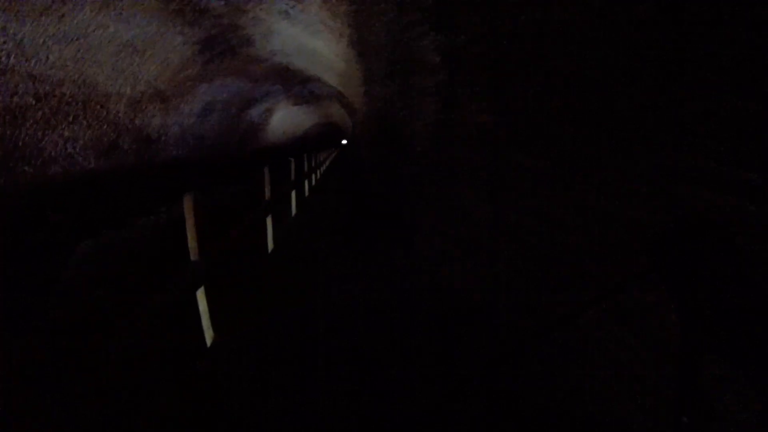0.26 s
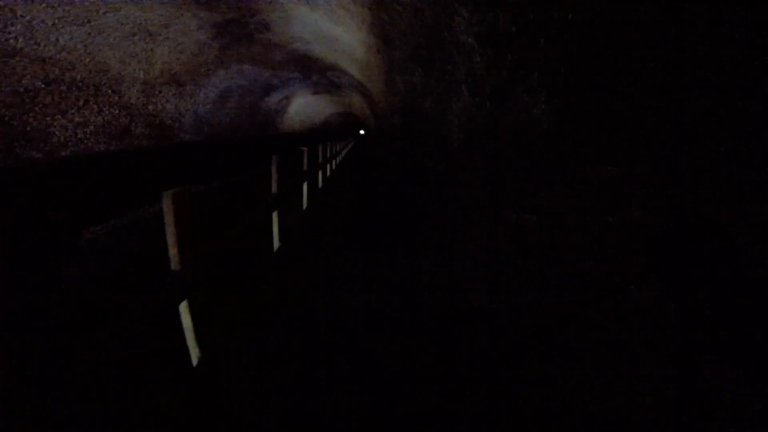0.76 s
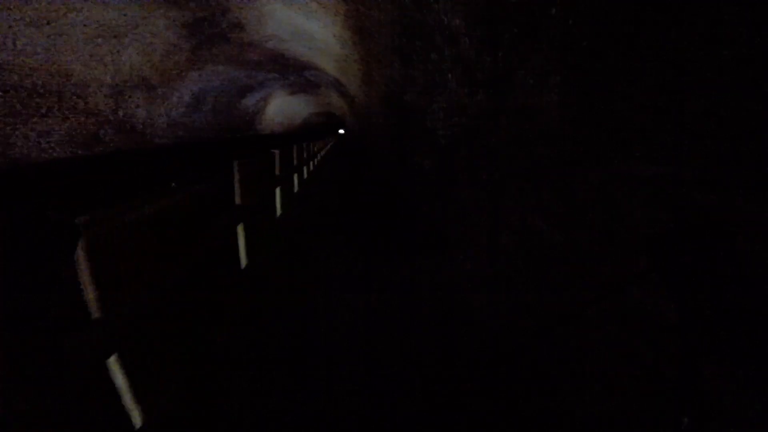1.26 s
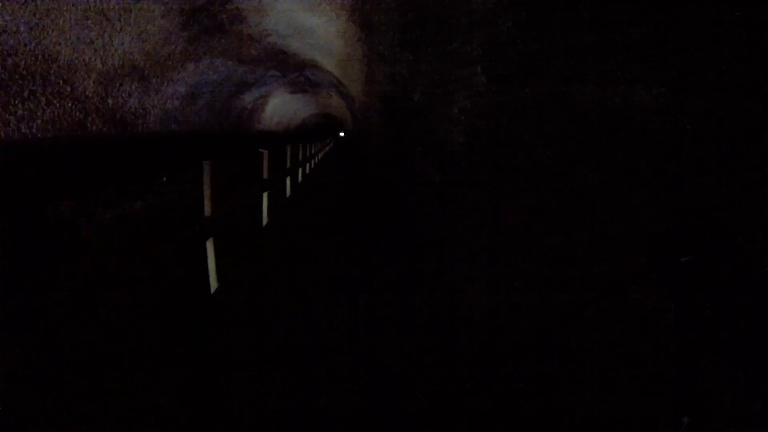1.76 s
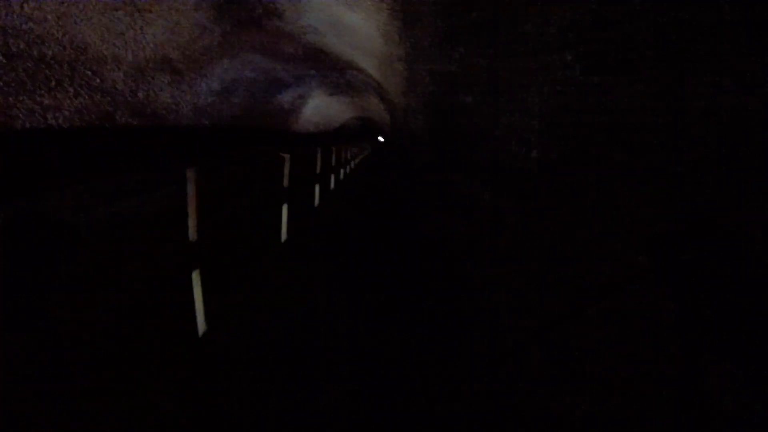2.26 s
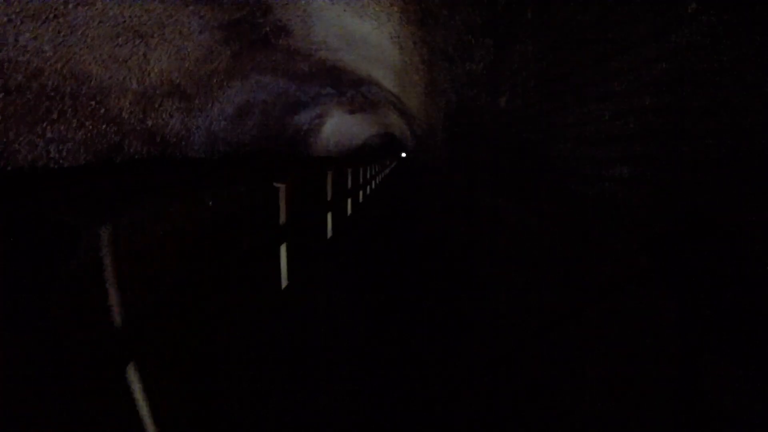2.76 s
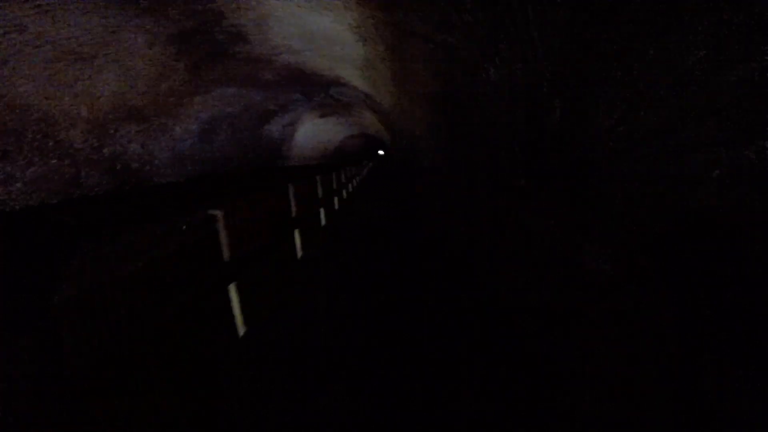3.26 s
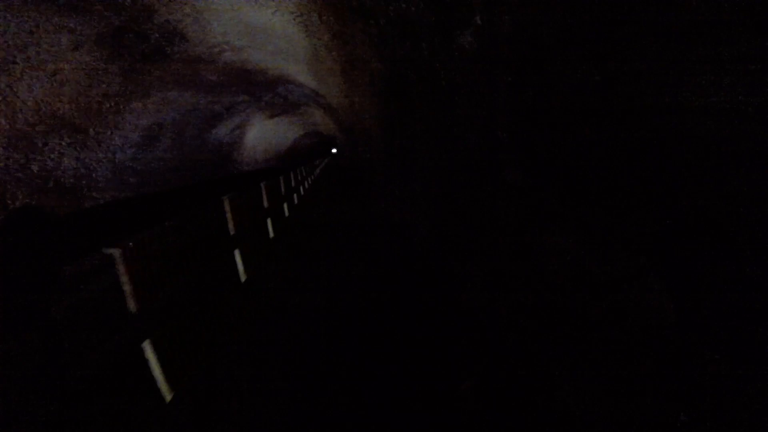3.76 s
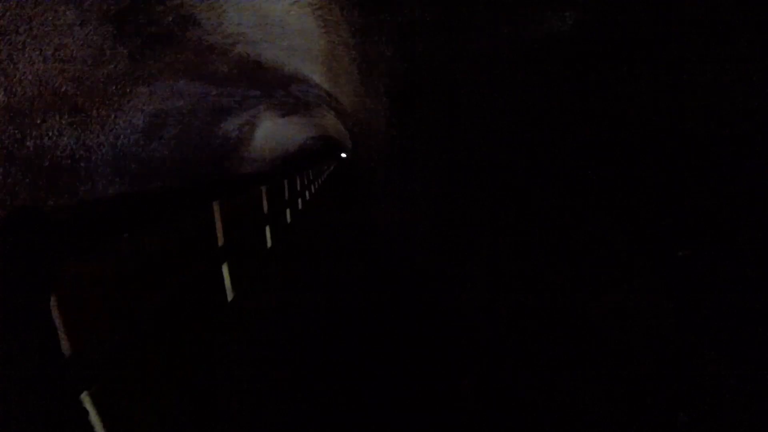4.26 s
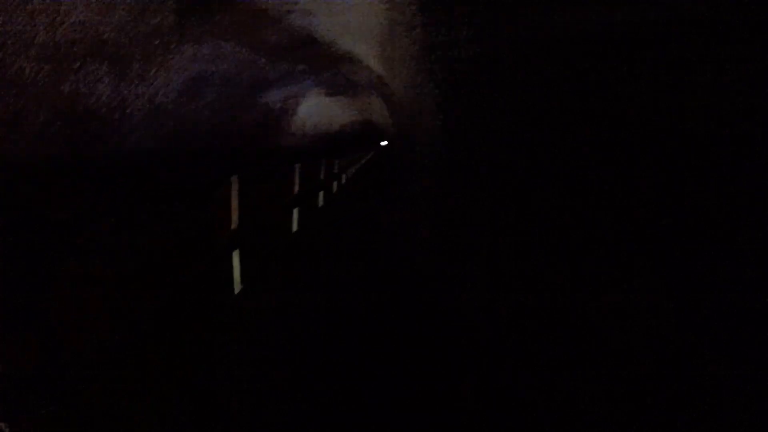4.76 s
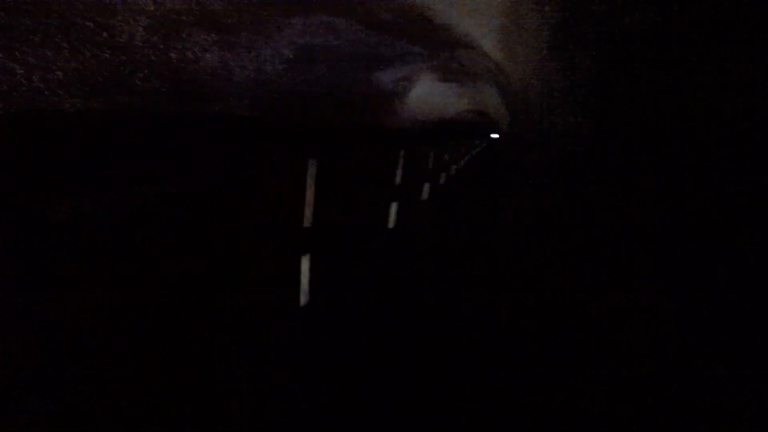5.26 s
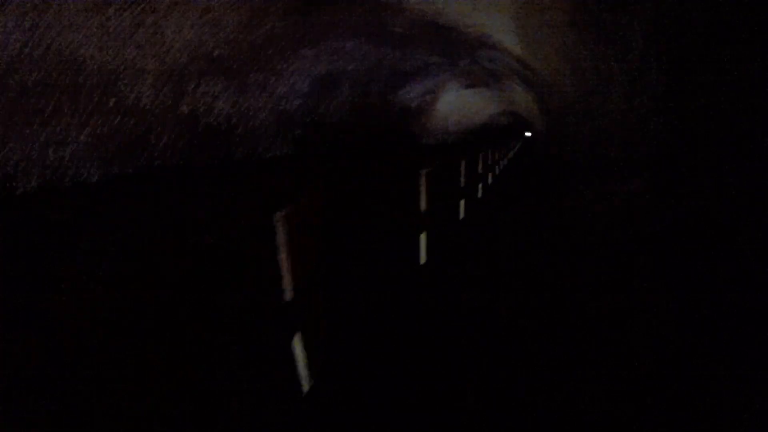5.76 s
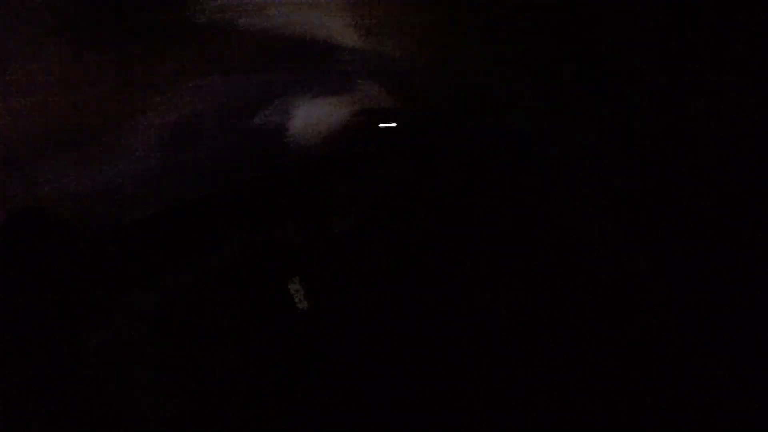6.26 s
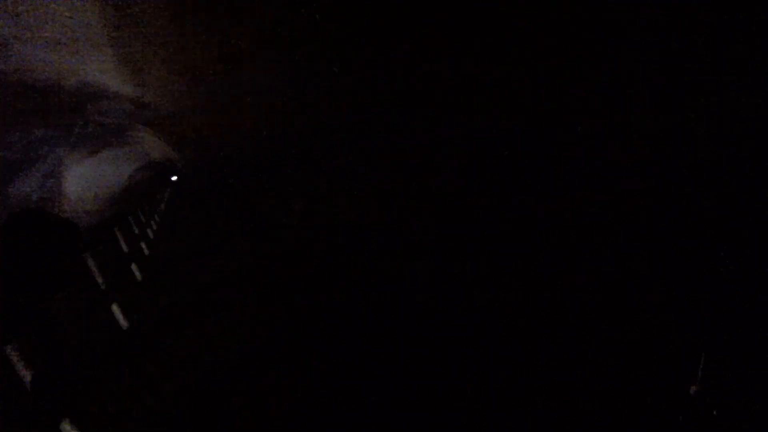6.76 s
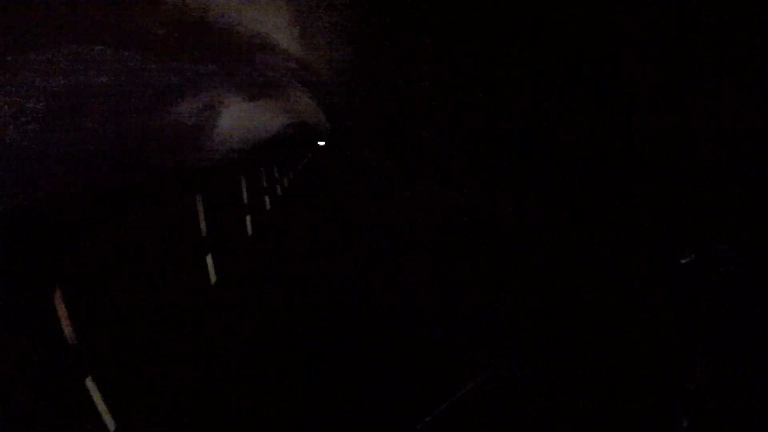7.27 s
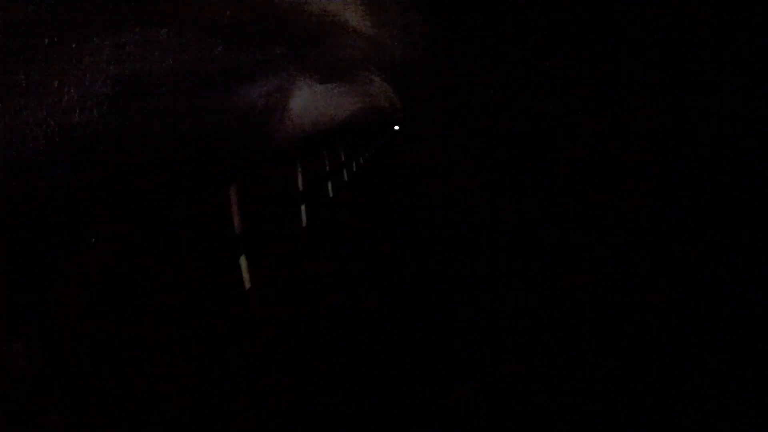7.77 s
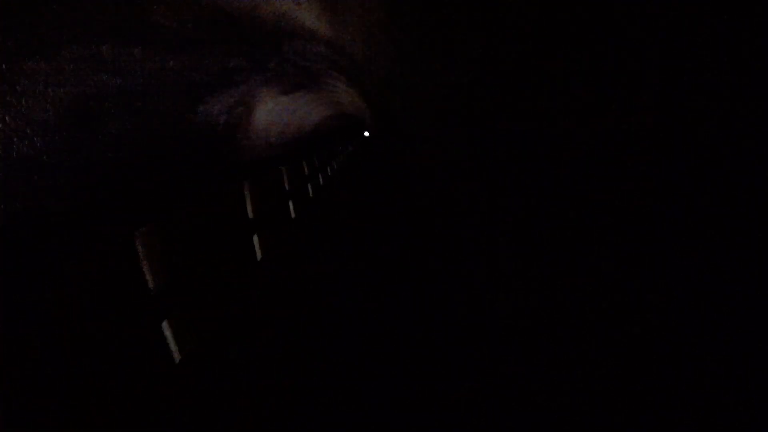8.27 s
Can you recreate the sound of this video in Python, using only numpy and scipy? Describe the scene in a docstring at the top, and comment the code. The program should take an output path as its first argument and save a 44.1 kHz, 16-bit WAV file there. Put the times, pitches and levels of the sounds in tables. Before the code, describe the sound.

Small plastic casing knocks, ticks and rubs in a walker's hand over dull low footfalls in a brick tunnel, one hard crack near the end.

```python
"""A walk on a hard path through a long brick tunnel, with a small plastic casing held in the hand.
From the start, knocks, ticks and rubs excite short, dry casing modes, while a low boom of footfalls,
thin cloth hiss and a quiet floor of shaped noise lie beneath. A faint hum of narrow noise first swells
after 2 s; two stick-slip squeaks come just after 6 s, a last hum at 8.35 s. The hardest knock falls
near 7.76 s. Each knock leaves a faint tail of decaying noise from the walls."""
import sys
import numpy as np
from scipy import signal
from scipy.fft import rfft, irfft, next_fast_len
from scipy.io import wavfile
from scipy.ndimage import uniform_filter1d

SR = 44100
rng = np.random.default_rng(int(sys.argv[2]) if len(sys.argv) > 2 else 0)


def to_wav(sig):
    """Store sig (one row per channel, or 1-D mono) as 16-bit WAV at the path in sys.argv[1].

    Samples outside -1..1 are clipped; the rate is SR.
    """
    pcm = np.clip(np.atleast_2d(sig), -1, 1) * 32767
    pcm = np.round(pcm).astype(np.int16)
    wavfile.write(sys.argv[1], SR, pcm.T)  # frames by channels


N = 374850

# Knocks and creaks: t/s, dull level/dB, hollow level/dB, sharp level/dB, favoured f/Hz, nominal contact/ms
KNOCKS = [(0.449, -41.5, -18, -35.5, 1180, 4.6), (0.675, -39, -60, -53, 634, 6.8),
          (1.297, -49, -38.5, -36.5, 2440, 5.5), (1.573, -38.5, -32, -52, 1350, 5.8),
          (1.6868, -38, -44.5, -52, 300, 14), (1.8, -43.5, -37, -48, 1480, 4.1),
          (1.874, -71, -38.5, -45, 1590, 3.8), (1.892, -67, -43.5, -42.5, 1520, 9),
          (2.0047, -37, -48, -61, 364, 4), (2.151, -40, -46, -46, 1190, 4.9),
          (2.185, -64, -43.5, -45, 1170, 3.6), (2.311, -72.5, -41.5, -50, 1350, 18),
          (2.443, -42, -43, -43, 3530, 4.4), (2.5033, -35.5, -26.5, -46, 1570, 5),
          (2.576, -26.5, -34.5, -34.5, 327, 4.6), (2.5953, -30.5, -32.5, -36.5, 1380, 3.6),
          (2.705, -35.5, -47, -55, 322, 8.4), (3.0078, -45, -34.5, -49, 1480, 8.8),
          (3.0406, -44, -25.5, -33.5, 1430, 5.2), (3.18, -34.5, -42.5, -50.5, 313, 4.1),
          (3.448, -32.5, -43, -48, 276, 5.1), (3.5936, -41, -40.5, -51, 1490, 9.5),
          (3.8741, -37, -61, -42.5, 3400, 5.8), (3.886, -30.5, -37.5, -46, 400, 4.7),
          (3.964, -32.5, -28, -43, 1560, 5.6), (4.056, -37.5, -38.5, -46, 312, 15),
          (4.08, -38, -35, -60, 1450, 4.9), (4.1471, -35, -34, -39, 1310, 4.7),
          (4.1613, -63, -25, -26.5, 2430, 6.1), (4.6803, -45, -41, -38.5, 3080, 5.3),
          (4.9297, -37.5, -44, -43.5, 3420, 7.1), (5.006, -38, -47.5, -62, 239, 8.3),
          (5.132, -33, -29, -41.5, 1420, 4.3), (5.404, -70, -42.5, -47.5, 1250, 10.4),
          (5.625, -45, -38, -41, 1530, 8.1), (5.953, -40, -46, -41, 3520, 15),
          (5.9654, -29, -39, -36, 3700, 15), (5.9824, -29.5, -33.5, -59, 1500, 27),
          (6.042, -25.5, -55, -43, 362, 7.6), (6.0556, -28.5, -36.5, -47, 326, 32),
          (6.1317, -28.5, -40, -40, 294, 6.3), (6.226, -96, -38.5, -47.5, 1330, 16),
          (6.4091, -28.5, -40.5, -47, 374, 5.3), (6.5598, -32.5, -33, -36.5, 1530, 3.6),
          (6.5793, -34.5, -32.5, -28.5, 3210, 5.7), (6.729, -68, -38.5, -47.5, 1370, 37),
          (6.762, -79, -32.5, -45, 1530, 17), (7.0102, -44, -41.5, -42.5, 1110, 5.4),
          (7.0977, -68, -43, -41, 2680, 2.6), (7.288, -23, -35.5, -43, 228, 2),
          (7.5069, -39.5, -37.5, -51, 1410, 21), (7.528, -39.5, -29, -38.5, 1340, 4),
          (7.63, -57, -36, -45, 1310, 1.7), (7.6479, -51, -37.5, -42.5, 1350, 3.8),
          (7.718, -34, -34.5, -41, 1500, 4.9), (7.751, -21.5, -24, -34.5, 1470, 5.5),
          (7.7613, -8, -11, -12, 5250, 0.27), (7.7639, -50, -9.5, -20, 1460, 3.5),
          (7.8832, -46, -32, -38, 1230, 5.8), (7.9, -32, -35.5, -41, 476, 2.3),
          (7.9638, -29, -33, -30, 4900, 3), (8.0112, -16.5, -24, -38, 520, 2.7),
          (8.1159, -39, -39.5, -41.5, 1340, 4.7), (8.261, -70, -37, -38.5, 1920, 8.4),
          (8.3027, -28, -29, -44, 1580, 8.7), (8.35, -31, -38, -32, 3740, 10.3),
          (8.407, -49, -43, -38.5, 3570, 5.5)]
# Light ticks of a finger or a speck of grit: t/s, level/dB at a mode of the pitch, f/Hz
TICKS = [(.115,-43.5,333),(0.218,-54,1300),(0.2685,-36,1340),(0.293,-41,285),(.326,-43,1380),
         (0.36,-45,1340),(0.7151,-45.5,3520),(0.962,-46,3420),(0.987,-45,1010),(1.036,-43.5,383),(1.086,-44,1100),(1.125,-41.5,1250),(1.174,-41,1060),
         (1.356,-33.5,360),(1.502,-44.5,620),(1.649,-40,1340),(1.74,-38.5,3830),(1.75,-44.5,1500),(1.959,-39,3900),(2.026,-41.5,3730),
         (2.165,-39,4230),(2.335,-37.5,1320),(2.4849,-42,3300),(2.541,-35,1550),(2.723,-37.5,1290),(2.754,-42.5,3450),
         (2.801,-44,1360),(2.9097,-34.5,1340),(2.927,-44,1430),(2.952,-36,1520),(2.965,-35.5,1450),
         (2.988,-37,1480),(3.056,-31.5,1600),(3.324,-33,330),(3.427,-41,3730),(3.519,-41.5,1360),(3.549,-39.5,1340),
         (3.618,-40,1290),(3.653,-45,1400),(3.704,-47.5,2020),(3.736,-45,402),
         (3.811,-39,490),(3.998,-33,3240),(4.019,-31,1550),(4.091,-38,1510),(4.193,-33,1730),(4.246,-41.5,418),(4.353,-39,377),(4.612,-46,1400),(4.703,-57,1290),(4.733,-48,2500),
         (4.92,-37,1970),(5.0284,-42.5,3860),(5.096,-40.5,400),(5.225,-35.5,3900),
         (5.4189,-41,1250),(5.454,-30,285),(5.6684,-36.5,367),(5.764,-46.5,3120),(6.163,-44,2820),(6.5454,-32.5,1570),
         (6.631,-36,3270),(6.65,-34,1000),(6.6606,-37.5,3520),(6.975,-30.5,366),(7.138,-35.5,516),(7.188,-35,458),
         (7.248,-43,1310),(7.307,-32,1190),(7.552,-28,3070),(7.5982,-28.5,1340),(7.815,-36.5,506),(7.877,-32.5,494),
         (7.921,-34,504),(7.996,-39,5140),(8.004,-41,3600),(8.03,-44,3500),(8.191,-42,1440),(8.202,-41,475),(8.2346,-32.5,1460),
         (8.363,-33,5030),(8.446,-38,465)]
# Rubbery squeaks: t/s, length/s, f/Hz, level/dB
SQUEAKS = [(6.014, 0.014, 1647, -27), (6.111, 0.0086, 1506, -29.5)]
# Casing modes in three groups, before detuning and damping: f/Hz, decay time for 60 dB/s, relative level/dB
DULL_MODES = [(264.7, 0.059, -4), (402, 0.032, 1.5), (500, 0.017, 3.5), (616, 0.032, -2)]
HOLLOW_MODES = [(1080, 0.0092, -5), (1410, 0.0057, 13.5), (1344, 0.012, 11), (1473, 0.028, -6),
                (1590, 0.014, 1.5), (2077, 0.0071, 10)]
SHARP_MODES = [(2525, 0.016, 10), (2880, 0.016, 5.5), (3307, 0.01, 15), (3536, 0.0013, 22.5),
               (4830, 0.0025, 11), (10050, 0.0057, 1), (12200, 0.0051, 3.6)]
# Excited band of the dull, hollow and sharp groups: lower f/Hz, upper f/Hz
BANDS = [(90, 800), (700, 2600), (1900, 14000)]
# Pitch favoured among the dull modes by the grip: t/s, f/Hz
GRIP_PITCH = [(0, 371), (7.77, 346), (7.81, 516)]
# Rubs of hand and cloth, one with each stride, before flutter: t/s of the height, hollow level/dB, sharp level/dB
RUBS = [(0.49, -53, -62), (1.22, -57, -62), (1.82, -59, -62.5), (2.5, -54, -59.5), (3.03, -53.5, -56.5),
        (3.6, -55.5, -58), (4.1, -51, -58), (4.7, -51.5, -62), (5.41, -58, -61.5), (6.03, -50.5, -56.5),
        (6.68, -49.5, -53.5), (7.259, -55, -57.5), (7.62, -50, -54), (8.3, -53.5, -54)]
# Dull part of the rubbing, before flutter: t/s, level/dB
DULL_RUB = [(0.0, -69), (1.63, -58.5), (2.22, -61.5), (2.57, -48), (2.68, -56.5), (3.76, -57.5),
            (4.02, -53.5), (4.4, -64), (5.18, -60), (5.47, -63), (5.89, -55.5), (6.13, -52.5),
            (6.96, -58.5), (7.9, -51.5), (8.14, -59.5), (8.5, -50)]
# Friction in each mode group: damping time constant/s, size of slips over the rub (ratio)
FRICTION = [(.03, 1.4), (.005, 2.6), (.003, 3.2)]
# Footfall thuds: start t/s, time before the fall/s, level/dB of a complete rise
THUDS = [(1.302, 0.042, -40), (1.974, 0.083, -48), (2.13, 0.062, -48), (3.03, 0.03, -41.5),
         (3.103, 0.042, -47), (3.635, 0.058, -43), (3.878, 0.023, -41), (3.922, 0.049, -44.5),
         (4.952, 0.059, -51), (5.406, 0.056, -49.5), (5.675, 0.13, -53), (5.99, 0.085, -45.5),
         (6.057, 0.057, -37), (6.197, 0.028, -50), (6.391, 0.017, -33), (6.544, 0.021, -41),
         (6.939, 0.03, -47), (7.227, 0.12, -46.5), (7.355, 0.029, -37), (7.494, 0.12, -43.5),
         (7.74, 0.029, -28.5), (7.973, 0.082, -46.5), (8.314, 0.14, -47.5)]
# Low rumble between the thuds: t/s, level/dB
RUMBLE = [(0.0, -69.5), (0.64, -62), (1.02, -68.5), (1.51, -55.5), (1.77, -63), (2.39, -53), (4.61, -69.5),
          (5.25, -51), (5.47, -62), (5.68, -64), (5.94, -55.5), (6.49, -52.5), (7.19, -62.5), (7.46, -59),
          (8.31, -56.5), (8.5, -56)]
# Relative spectra of the deep rumble and the tunnel mode: f/Hz, level/dB per Hz
DEEP_COLOUR = [(9, -43), (16, -9), (50, -4.5), (90, -4.5), (200, -37)]
TUNNEL_MODE_COLOUR = [(60, -46), (90, -14.5), (124, 2.5), (150, -11), (200, -23), (320, -24.5)]
# Swells of narrow hum: start t/s, length/s, level/dB, rise of f/Hz
HUMS = [(2.242, 0.84, -63.5, 9.6), (4.953, 0.42, -62.5, 6.5), (6.164, 0.153, -53, 4.6),
        (8.35, 0.083, -53, 7.1)]
# Treble hiss of the cloth, before flutter: t/s, level/dB
HISS = [(0.0, -71), (.6, -71.5), (.88, -78.5), (1.2, -66.5), (1.77, -70), (2.51, -65), (2.89, -74),
        (3.35, -59.5), (3.76, -72.5), (4.5, -62.5), (5.85, -67.5), (6.06, -61), (7.4, -68.5), (7.54, -53),
        (7.6, -73), (7.76, -53.5), (7.85, -63), (7.96, -60), (8.04, -65), (8.5, -66.5)]
# Relative spectra of the hiss and the floor: f/Hz, level/dB per Hz
HISS_COLOUR = [(1500, 3), (3200, 5), (6500, 0.5), (8500, -5.5), (10000, -6), (11000, -9), (12000, -5),
               (13500, -18), (15300, -11)]
FLOOR_COLOUR = [(18, -34), (30, -20), (386, 1.5), (828, 16.5), (1400, 6), (3380, -50)]

GROUPS = (DULL_MODES, HOLLOW_MODES, SHARP_MODES)
RESPONSE_SAMPLES = 2600
PRESS_DB_S = 102  # added decay rate of the dull modes, in dB/s per dB of force
TICK_MS, TICK_SLOPE_DB = 3.3, 16.5  # nominal contact; loss per octave away from the pitch
RUB_RISE_DB_S, RUB_FALL_DB_S = 48.5, 39.5
HOLLOW_REST_DB, SHARP_REST_DB = -68, -72  # rub levels while the grip rests
THUD_RISE_S, THUD_FALL_S = 0.033, 0.011
HUM_HZ, HUM_WIDTH_HZ = 388, 6.7  # starting pitch, bandwidth
TUNNEL_DB, FLOOR_DB = -22.0, -67.5
EDGE_HZ = 15500


def knocks():
    """Modal excitation: a first blow and a spatter of slips drive modes weighted by the spot struck."""
    out, t = np.zeros(N), np.arange(RESPONSE_SAMPLES) / SR
    for s, dull_db, hollow_db, sharp_db, hz, ms in KNOCKS + ticks():
        uneven = gain_of(1.32 * rng.standard_normal((4, RESPONSE_SAMPLES)))
        shared, *own = rng.standard_normal((4, RESPONSE_SAMPLES)) * uneven
        spot = rng.standard_normal((3, 2, 8))
        contact = 0.00097 * max(ms, .3)
        onset = 1 - np.exp(-t / (0.018 * contact))
        shape = onset * np.exp(-(t / (0.92 * contact)) ** 0.85)
        levels = (dull_db, hollow_db, sharp_db)
        for modes, band, db, (weight, shift), slips in zip(GROUPS, BANDS, levels, spot, own):
            is_dull = modes is DULL_MODES
            drive = 0.27 * (shared + 0.58 * slips) * shape
            drive[0] = 4.65 * np.exp(-ms / 4.6)  # brief contacts are mostly one blow
            pitch = hz
            if is_dull and hz >= band[1]:
                pitch = np.interp(s, *np.transpose(GRIP_PITCH))
            mode_hz = np.transpose(modes)[0]
            away = (np.log(mode_hz / pitch) / 0.13) ** 2
            near_db = np.maximum(-8. * away, -13.)  # favours modes near the pitch
            soft_db = -.55 * ms * mode_hz / 1000  # long contacts are softer and lose the top modes
            scatter_db = 2.5 * weight[:len(modes)]
            detune = 1 + .025 * shift[:len(modes)]
            detune = detune * (pitch / mode_hz) ** np.exp(-.4 * away)  # nearby modes lean towards the pitch
            # hard blows press the casing into the palm
            pressed = gain_of(-PRESS_DB_S * max(db + 28.5, 0) * t * is_dull)
            body = pressed * ring(modes, band, near_db + soft_db + scatter_db, detune)
            sound = signal.fftconvolve(drive, body)[:RESPONSE_SAMPLES]
            top = np.sqrt(2 * uniform_filter1d(sound ** 2, size=110).max())  # amplitude of an equal sine
            add(out, s, gain_of(db) * sound / top)
    return out


def ticks():
    """Selective resonance: a light knock excites each group less the further its nearest mode lies."""
    rows = []
    for s, db, hz in TICKS:
        octaves = [abs(np.log2(np.transpose(modes)[0] / hz)).min() for modes in GROUPS]
        rows.append((s, *[db - TICK_SLOPE_DB * away for away in octaves], hz, TICK_MS))
    return rows


def ring(modes, band_hz, extra_db=0, detune=1):
    """Modal superposition: damped sines answer a rounded tap that excites little outside its band."""
    hz, t60, db = np.transpose(modes)[:, :, None]
    t = np.arange(RESPONSE_SAMPLES) / SR
    decay = gain_of(db + np.reshape(extra_db, (-1, 1)) - 60 * t / t60)
    onset = 1 - np.exp(-t / .00008)
    tones = np.sin(2 * np.pi * hz * np.reshape(detune, (-1, 1)) * t)
    body = (decay * onset * tones).sum(0)
    band = signal.butter(2, band_hz, "band", fs=SR)
    return signal.lfilter(*band, signal.lfilter(*band, body))


def squeaks():
    """Regular stick-slip: a tone with its second harmonic swells, then drops to a short tail."""
    out = np.zeros(N)
    for s, length, hz, db in SQUEAKS:
        t = np.arange(0, 3.6 * length, 1 / SR)
        tail = 0.24 * np.exp(-(t - length) / 0.0069)
        shape = np.minimum(t / (0.17 * length), 1) * np.where(t < length, 1, tail)
        shape = uniform_filter1d(shape, size=60)
        turn = 2 * np.pi * hz * t
        add(out, s, gain_of(db) * shape * (np.sin(turn) + .08 * np.sin(2 * turn)))
    return out


def rubbing():
    """Dry friction: clumped noise with short gritty slips is filtered by the damped casing modes."""
    clumps_db = 2.4 * flutter(35.)
    slip_chance = 65. / SR * np.exp(.6 * flutter(7.))  # per sample; slips come in bunches
    grit = np.exp(-np.arange(400) / SR / 0.0014)
    t = np.arange(RESPONSE_SAMPLES) / SR
    out = 0
    for modes, band, db, (damping_s, bite) in zip(GROUPS, BANDS, rub_levels(), FRICTION):
        size = gain_of(4.5 * np.minimum(rng.exponential(1, N), 1.5))
        slips = signal.oaconvolve((rng.random(N) < slip_chance) * size, grit)[:N]
        drive = rng.standard_normal(N) * (1 + bite * slips)
        soft_db = -np.transpose(modes)[0] / 1200.0  # soft skin dulls the top
        body = ring(modes, band, soft_db) * np.exp(-t / damping_s)  # the grip damps the casing
        sound = evened(signal.oaconvolve(drive, body)[:N])
        out = out + gain_of(db + clumps_db + 2.14 * flutter(22.)) * sound
    return out


def rub_levels():
    """Exponential growth and decay: each stride lifts hollow and sharp friction above rest."""
    s, *tops_db = np.transpose(RUBS)[:, :, None]
    since = np.arange(0, N, 64) / SR - s  # one level per 64 samples
    drop_db = np.where(since < 0, -RUB_RISE_DB_S * since, RUB_FALL_DB_S * since)
    levels = curve(DULL_RUB)
    for top_db, rest_db in zip(tops_db, (HOLLOW_REST_DB, SHARP_REST_DB)):
        part = np.maximum((top_db - drop_db).max(0), rest_db)
        levels.append(np.repeat(part, 64)[:N])
    return levels


def tunnel(x):
    """Reverberation: convolution with half a second of noise whose bass and treble decay at own rates."""
    t = np.arange(SR // 2) / SR
    noise = rng.standard_normal(len(t)) * (t > .008)
    low = signal.lfilter([.2], [1, -.8], noise)
    tail = low * gain_of(-60 * t / 0.68) + 2.1 * (noise - low) * gain_of(-60 * t / 1.5)
    return signal.fftconvolve(x, tail / np.linalg.norm(tail))[:N]


def boom():
    """Low-frequency resonance: footfalls and sway sound as deep rumble and a tunnel mode, wavering apart."""
    deep_waver, mode_waver = gain_of([2 * flutter(18), 2 * flutter(18)])
    deep = gain_of(-2.0) * deep_waver * coloured(DEEP_COLOUR)
    both = deep + mode_waver * coloured(TUNNEL_MODE_COLOUR)
    steady = both / uniform_filter1d(both ** 2, size=2600) ** .35  # long swells are held down
    return boom_level() * evened(steady)


def boom_level():
    """Transient envelope: thuds rise linearly, hold if long enough, and decay exponentially over rumble."""
    level = gain_of(curve(RUMBLE)[0])
    for s, length, db in THUDS:
        t = np.arange(0, length + 8 * THUD_FALL_S, 1 / SR)
        fall = np.exp(-np.maximum(t - length, 0) / THUD_FALL_S)
        add(level, s, gain_of(db) * np.minimum(t / THUD_RISE_S, 1) * fall)
    return level


def hum():
    """Narrow-band modulation: slow complex noise rides on a tone that swells, glides up and fades."""
    out = np.zeros(N)
    for s, length, db, rise_hz in HUMS:
        u = np.arange(0, length, 1 / SR) / length
        a, b = rng.standard_normal((2, SR))[:, :len(u)]
        fuzz = signal.lfilter([1], [1, -np.exp(-np.pi * HUM_WIDTH_HZ / SR)], a + 1j * b)
        carrier = np.exp(2j * np.pi * np.cumsum(HUM_HZ + rise_hz * u) / SR)
        tone = (fuzz * carrier).real
        add(out, s, gain_of(db) * np.sqrt(abs(np.sin(np.pi * u))) * evened(tone))
    return out


def hiss():
    """Broadband friction noise: thin treble swishes with the cloth and flutters slowly."""
    return gain_of(curve(HISS)[0] + 1.2 * flutter(5.)) * coloured(HISS_COLOUR)


def floor():
    """Stationary noise: a steady, quiet background of fixed spectrum."""
    return gain_of(FLOOR_DB) * coloured(FLOOR_COLOUR)


def gain_of(db):
    """Level definition: decibels become an amplitude ratio."""
    return 10 ** (np.asarray(db) / 20)


def evened(x):
    """Power normalization: the signal is scaled to rms 1."""
    return x / np.sqrt(np.mean(x ** 2) + 1e-20)


def curve(rows):
    """Linear interpolation: table columns after t/s are read at every sample."""
    s, *columns = np.transpose(rows)
    return [np.interp(np.arange(N) / SR, s, c) for c in columns]


def coloured(points):
    """Spectral shaping: white noise takes the given spectrum and rms 1."""
    f, db = np.transpose(points)
    size = next_fast_len(N)
    log_hz = np.log(np.fft.rfftfreq(size, 1 / SR) + 1)
    shape = np.interp(log_hz, np.log(f), db, left=-90, right=-90)
    return evened(irfft(rfft(rng.standard_normal(N), size) * gain_of(shape), size)[:N])


def flutter(per_s):
    """Slow random modulation: lines join normal random values drawn at the given rate."""
    knots = rng.standard_normal(400)
    return np.interp(np.arange(N) / SR * per_s, np.arange(len(knots)), knots)


def add(mix, s, sound):
    """Linear superposition: a sound is added in place from time s."""
    part = mix[round(s * SR):][:len(sound)]
    part += sound[:len(part)]


def scene():
    """Superposition of casing sounds, their wall tail, rubbing, boom, hum, hiss and floor."""
    hits = knocks() + squeaks()
    mix = hits + gain_of(TUNNEL_DB) * tunnel(hits) + rubbing() + boom() + hum() + hiss() + floor()
    return mix[None]


def record(dry):
    """Band limitation: a linear-phase low-pass filter ends the spectrum near EDGE_HZ."""
    low_pass = signal.firwin(511, EDGE_HZ, window=("kaiser", 9), fs=SR)
    return signal.oaconvolve(dry, low_pass[None], "same")


dry = scene()
out = record(dry)
to_wav(out)
```